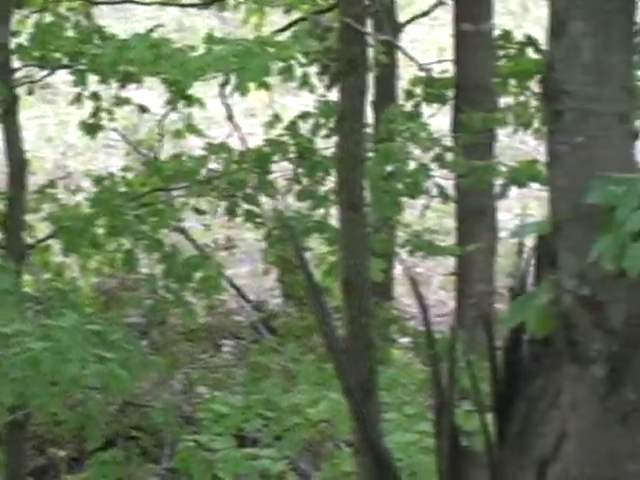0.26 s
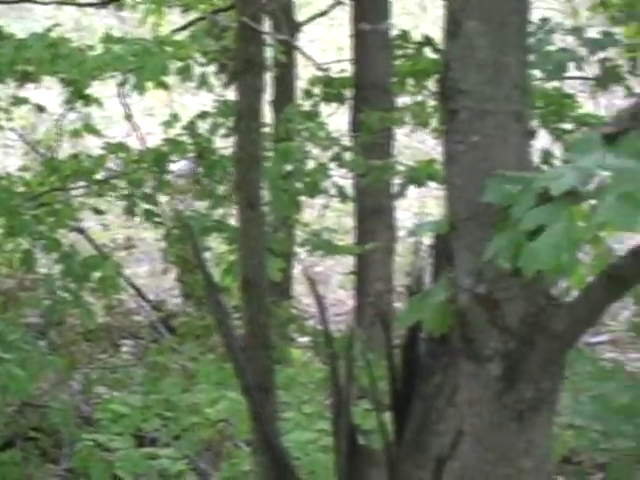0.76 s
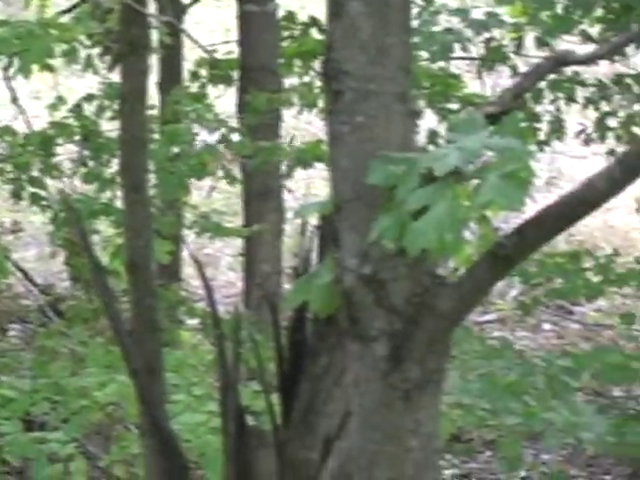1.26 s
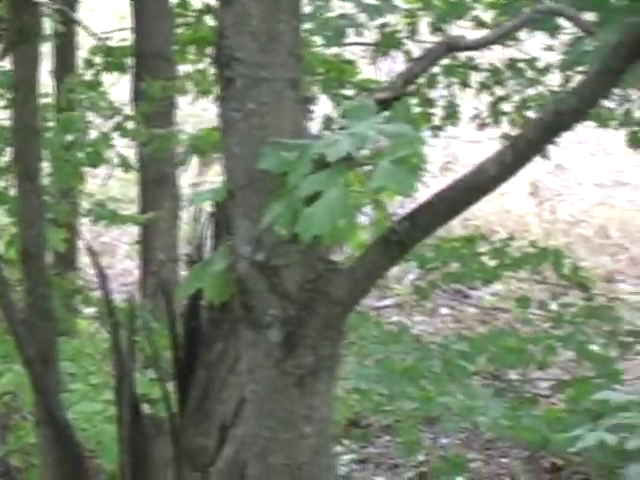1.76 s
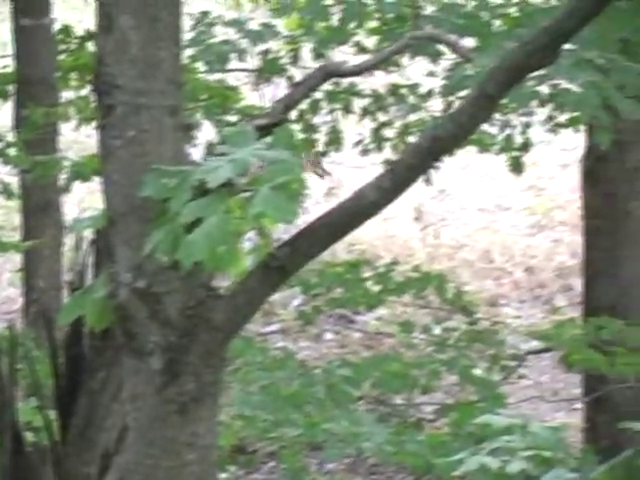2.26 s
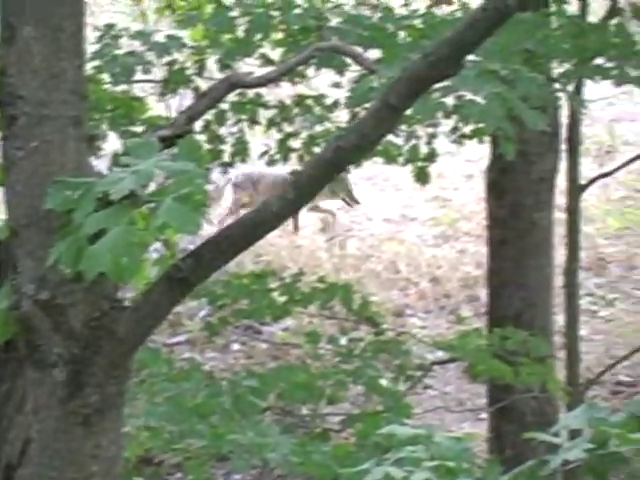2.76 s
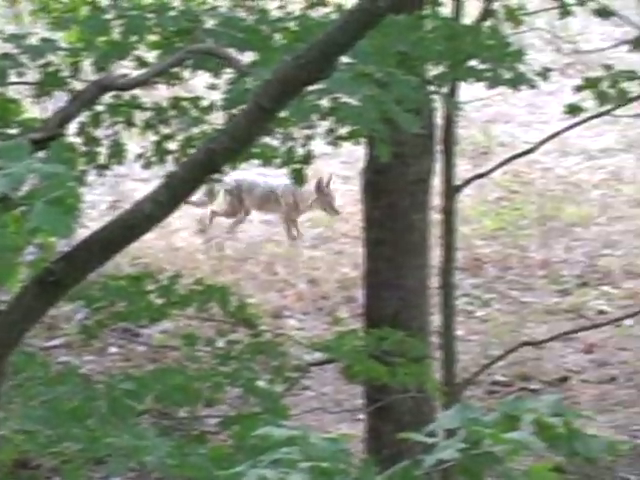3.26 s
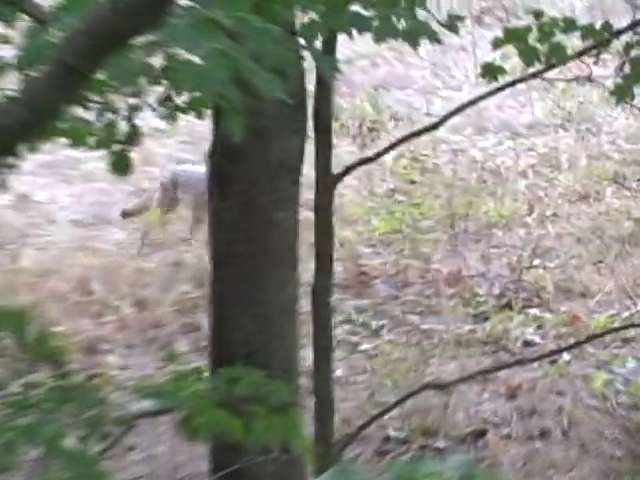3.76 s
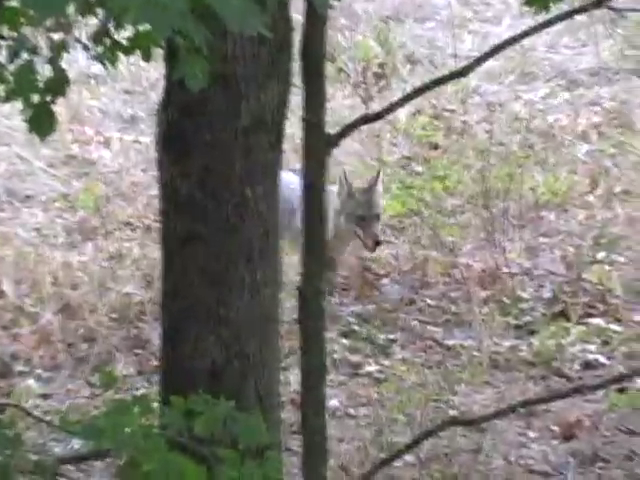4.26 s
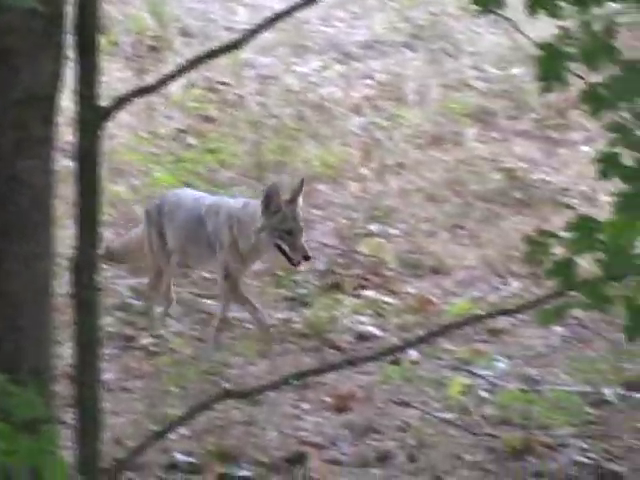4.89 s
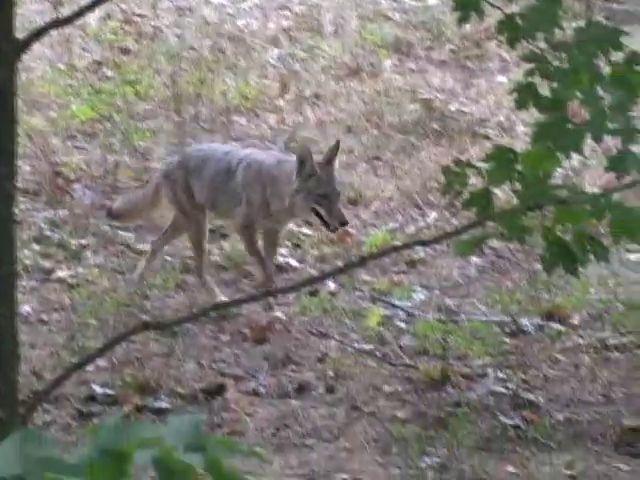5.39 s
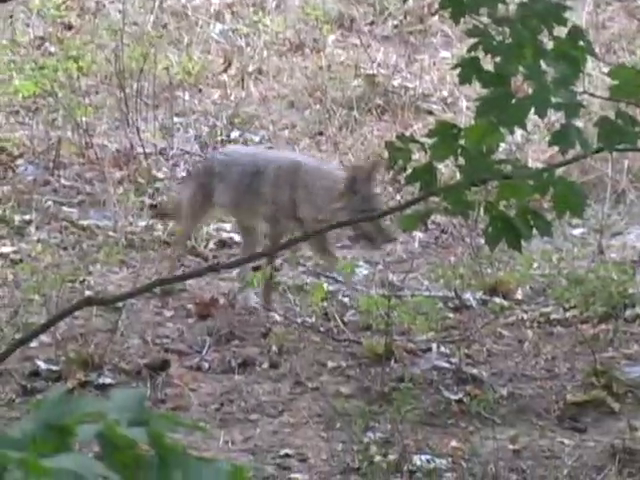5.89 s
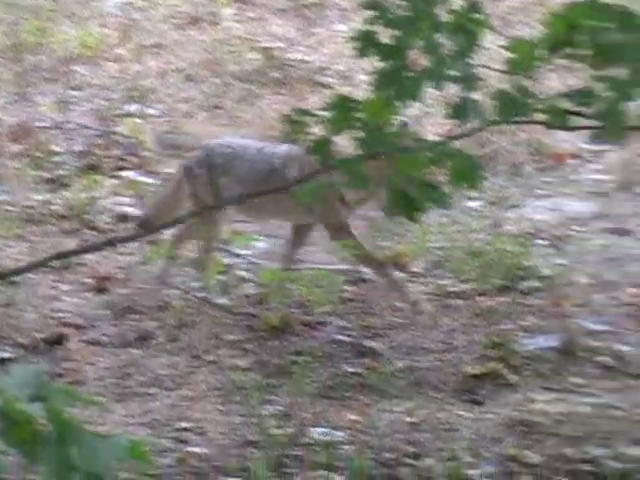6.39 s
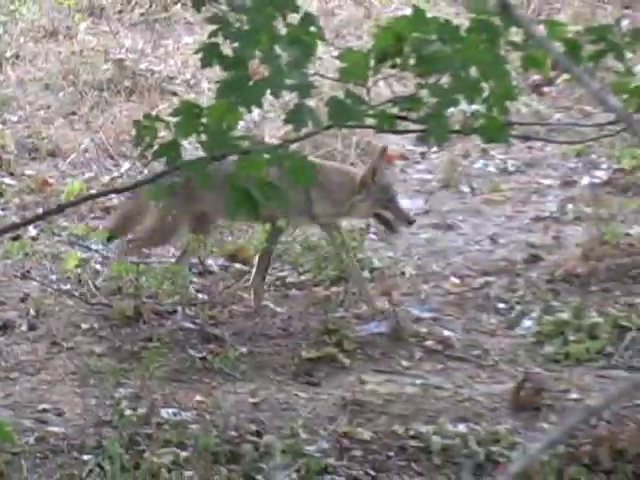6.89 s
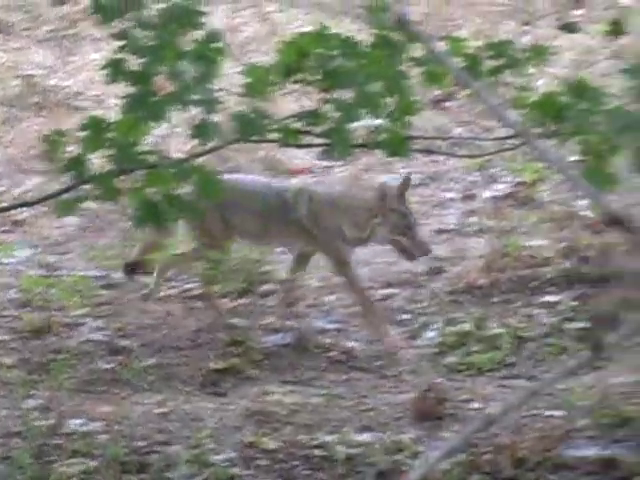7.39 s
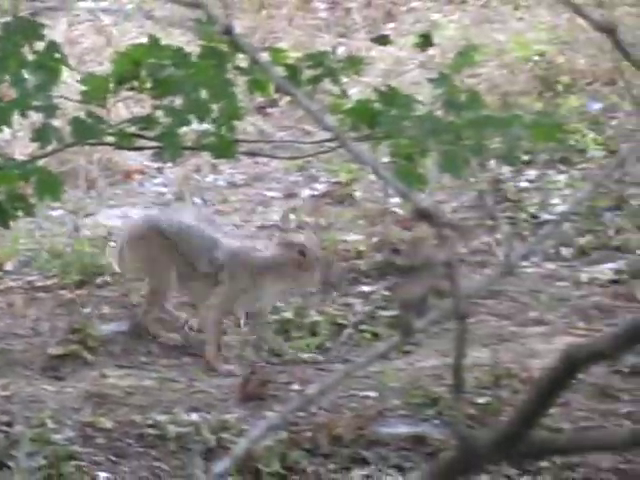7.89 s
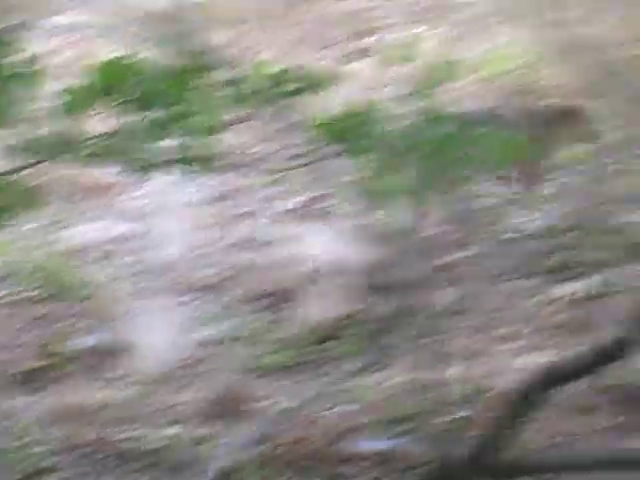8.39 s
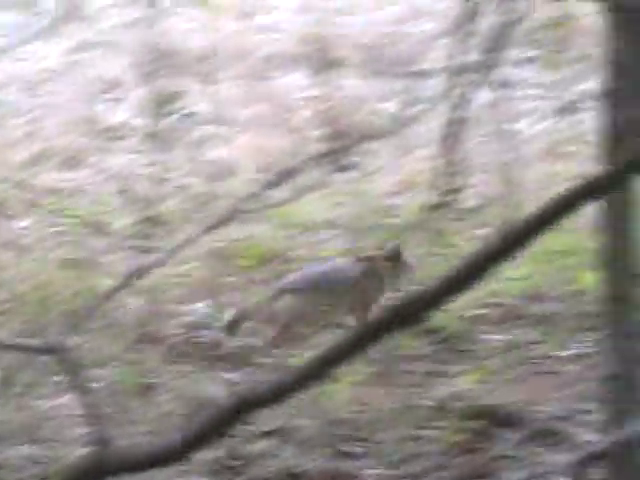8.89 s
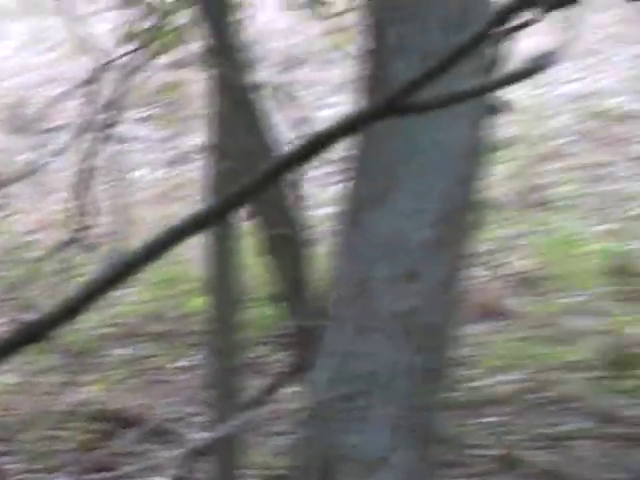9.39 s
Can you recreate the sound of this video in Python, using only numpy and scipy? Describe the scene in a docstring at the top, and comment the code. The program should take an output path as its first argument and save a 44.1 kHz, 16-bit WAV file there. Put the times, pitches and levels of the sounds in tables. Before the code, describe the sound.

A coyote trots over dry leaves amid singing insects, until a close bow shot and arrow smack send it bolting with a yelp.

```python
"""A coyote trots over dry leaves in summer woods, each paw setting off a burst of tiny fractures.
Insects sing, a far machine hums, faint calls carry through the trees, and a camera's zoom clicks and
purrs. A bow fires close on the right, its string and frame ringing in their modes, and the arrow
smacks into the ground. The coyote bolts through the litter with one short, quavering yelp.
Trunks and foliage scatter the sound into a thin reverberant tail."""
import sys
import numpy as np
from scipy import signal
from scipy.fft import rfft, irfft, next_fast_len
from scipy.io import wavfile
from scipy.ndimage import map_coordinates

SR = 44100
rng = np.random.default_rng(int(sys.argv[2]) if len(sys.argv) > 2 else 0)


def master_out(mix):
    """Clip the mix to full scale and print it as 16-bit PCM to the path in sys.argv[1]."""
    frames = np.transpose(np.atleast_2d(mix))
    ceiling = np.clip(frames, -1, 1)
    pcm = np.round(ceiling * 32767).astype(np.int16)
    wavfile.write(sys.argv[1], SR, pcm)


N = 425549
TIME = np.arange(N) / SR
AFTER = TIME[:SR // 2]  # seconds since the onset of a short event


def amp(db):
    """Decibels to amplitude ratio."""
    return np.exp(np.asarray(db) * np.log(10) / 20)


def unit(x):
    """Scale to rms 1."""
    return x / np.sqrt(np.mean(x ** 2) + 1e-20)


def along(points, hz):
    """Interpolate (Hz, value) points on a logarithmic frequency axis."""
    freqs, values = np.transpose(points)
    return np.interp(np.log(hz + 1), np.log(freqs + 1), values)


def curve(rows, outside=None):
    """Interpolate (seconds, value) points at every sample."""
    times, values = np.transpose(rows)
    return np.interp(TIME, times, values, outside, outside)


def level(rows):
    """Gain from (seconds, dB) points, silent outside their span."""
    return amp(curve(rows, -200))


def wobble(rate, step=32):
    """Smooth random modulation with `rate` knots a second."""
    coarse = TIME[::step]
    knots = rng.standard_normal(int(N * rate / SR) + 4)
    return np.interp(TIME, coarse, map_coordinates(knots, [coarse * rate]))


def swell(start, rise, decay, hold=0):
    """Envelope with a smooth rise, a hold and an exponential decay, all in seconds."""
    age = np.maximum(TIME - start, 0)
    attack = np.sin(np.pi / 2 * np.minimum(age / rise, 1)) ** 2
    return attack * np.exp(-np.maximum(age - rise - hold, 0) / decay)


def filtered(x, response):
    """Zero-phase filter whose gain is a function of frequency."""
    size = next_fast_len(N + 8192)
    return irfft(rfft(x, size) * response(np.fft.rfftfreq(size, 1 / SR)), size)[..., :N]


def coloured(x, spectrum, size=2048):
    """Minimum-phase filter of unit energy, shaped by (Hz, dB) points."""
    magnitude = amp(along(spectrum, np.fft.rfftfreq(size, 1 / SR)))
    cepstrum = irfft(np.log(magnitude + 1e-6))
    cepstrum[1:size // 2] *= 2
    cepstrum[size // 2 + 1:] = 0
    kernel = irfft(np.exp(rfft(cepstrum)))
    return signal.oaconvolve(x, kernel[None] / np.linalg.norm(kernel), axes=1)[:, :N]


def pan(db):
    """Channel gains for a left-minus-right level difference."""
    half = np.atleast_1d(db) / 2
    gains = np.array([amp(half), amp(-half)])
    return gains / gains.mean(0)


def spread(pair, width):
    """Mid and side signals to left and right."""
    return np.array([pair[0] + width * pair[1], pair[0] - width * pair[1]])


def widened(pair, widths):
    """Mid and side to left and right, with a width that depends on frequency."""
    side = filtered(pair[1], lambda hz: along(widths, hz))
    return spread([pair[0], side], 0.96)


def noise(width):
    """White stereo noise."""
    return spread(rng.standard_normal((2, N)), width)


def crackle(rate, scatter_db, width):
    """Poisson impulses of uneven size, `rate` a second in each of mid and side."""
    sizes = amp(scatter_db * np.clip(rng.standard_normal((2, N)), -2, 2))
    signs = rng.choice([-1, 1], (2, N))
    occurs = rng.random((2, N)) < rate / SR
    return spread(unit(sizes * signs * occurs), width)


def phase_of(hz):
    """Phase in radians, the time integral of frequency."""
    return 2 * np.pi * np.cumsum(hz) / SR


def ring(hz, t60, phase=0):
    """A damped mode that falls 60 dB in t60 seconds."""
    return np.sin(2 * np.pi * hz * AFTER + phase) * np.exp(-np.log(1000) * AFTER / t60)


def add(track, start, sound):
    """Superpose a sound from `start` seconds."""
    part = track[..., max(round(start * SR), 0):][..., :sound.shape[-1]]
    part += sound[..., :part.shape[-1]]


def insect_chorus():
    """Many insects sum incoherently to a steady band of high noise."""
    # Each row: frequency in Hz, relative spectral density in dB.
    spectrum = [(3000, -46.5), (4400, -15), (5400, -7.5), (5700, -15), (6100, -31.5), (6600, -11.5),
                (7100, -2.5), (7500, -0.5), (7780, 0), (8150, -2.5), (8700, -9.5), (9600, -23.5),
                (11000, -46)]
    band = coloured(noise(0.52), spectrum)
    return band * amp(-55 - 0.03 * wobble(1.26) + 0.93 * wobble(110)) * pan(-2.5)


def triller():
    """Amplitude modulation cuts one insect's shrill, jittering tone into even pulses."""
    pulses = np.clip(np.sin(phase_of(21 + .4 * wobble(3))) + .3, 0, 1)
    return amp(-55) * pulses * np.sin(phase_of(7800 + 220 * wobble(900))) * pan(-5)


def cricket():
    """Stridulation: each wing stroke slows as it closes, so its pitch falls."""
    strokes = np.cumsum(71 + .4 * wobble(3)) / SR
    from_middle = strokes % 1 - .5
    tone = np.sin(phase_of(5600 - 1100 * from_middle + 60 * wobble(600)))
    sounding = np.floor(strokes) % 12 > 0  # every twelfth stroke is silent
    chirps = np.exp(-(from_middle / .19) ** 2) * sounding
    return amp(-52 + 0.99 * wobble(30)) * chirps * tone * pan(9.9)


def faint_insect():
    """A narrow band of noise, modulated in amplitude, swells about twice a second."""
    surge = amp(2.9 * np.sin(2 * np.pi * 2.1 * TIME + wobble(0.75)))
    band = coloured(noise(0.27), [(3700, -47), (4200, -6), (4400, -3), (4650, -8), (5200, -47)])
    return amp(-70.5) * surge * band * pan(5)


def air():
    """Air in the crowns makes a diffuse field, joined by a fine hiss and a draught's rumble."""
    # Each row: frequency in Hz, relative spectral density in dB.
    spectrum = [(20, -35), (35, -5), (50, -3.5), (70, 5), (130, 2), (320, -1), (450, -4.5), (620, -5.5),
                (1000, -9), (1400, -10), (2000, -12), (4000, -13.5), (10000, -18), (15500, -23)]
    # Each row: time in seconds, hiss level in dB.
    hiss_levels = [(0, -66), (1.2, -61), (3.2, -60.5), (4.2, -71), (6.3, -76), (9.65, -71)]
    mid, side = coloured(rng.standard_normal((2, N)), spectrum)
    # diffuse sound is alike at both microphone ports in the bass and unrelated higher up
    side = signal.sosfilt(signal.butter(1, 380, "high", fs=SR, output="sos"), side)
    crowns = spread([mid, side], 0.89) * amp(-57 + 0.48 * wobble(11))
    hiss = coloured(noise(0.41), [(3000, -23), (8000, -13), (11000, -5), (15500, -1)])
    # the draught rumbles at each port on its own
    draught = coloured(rng.standard_normal((2, N)), [(20, 0), (40, -4), (80, -22), (300, -72)])
    return crowns + hiss * level(hiss_levels) + amp(-74) * draught


def far_machine():
    """A drone of three low partials, each wandering in amplitude and phase."""
    # Each row: frequency in Hz, relative level in dB, left minus right in dB,
    # phase lag on the right in radians, unsteadiness from 0 to 1.
    partials = [(76, -66.5, -0.5, 0.5, .8), (107, -75.5, -6, 0.5, 0.9), (149.9, -50, -8, 2.56, 0.08)]
    # The drone shifts right as the camera turns. Each row: time in seconds, added left minus right in dB.
    turn = [(2.5, .3), (5, -1.6)]
    out = np.zeros((2, N))
    for hz, db, side_db, lag, unsteady in partials:
        tone = (1 + unsteady * (wobble(14) + 1j * wobble(14))) * np.exp(2j * np.pi * hz * TIME)
        out += amp(db + 3.5) * pan(side_db + curve(turn)) * np.real([tone, tone * np.exp(-1j * lag)])
    return out


def footfalls(rows, rise):
    """Joint envelope of (start, dB, decay) steps: incoherent sounds add in power."""
    power = np.zeros(N)
    press = np.sin(np.pi / 2 * np.minimum(AFTER / rise, 1)) ** 2
    for start, db, decay in rows:
        settle = np.exp(-np.maximum(AFTER - rise, 0) / decay)
        add(power, start, (amp(db) * press * settle) ** 2)
    return np.sqrt(power)


def leaf_litter():
    """Brittle fracture: paws crush dry leaves in dense bursts, with a few separate cracks."""
    # Paws at a trot. Each row: start in seconds, level in dB.
    steps = [(0, -57.0), (0.071, -55.5), (0.17, -49.5), (0.301, -55.5), (0.503, -53.0), (0.771, -51.5),
             (1.072, -56.0), (1.393, -52.5), (1.982, -60.0), (2.271, -57.0), (2.628, -56.0), (2.751, -56.0),
             (2.953, -58.5), (3.067, -60.0), (3.236, -57.5), (3.643, -54.0), (3.953, -50.5), (4.059, -57.5),
             (4.157, -56.0), (4.245, -56.5), (4.501, -56.5), (4.963, -62.5), (5.416, -58.5), (5.902, -57.5),
             (6.08, -56.5), (6.528, -55.5), (6.717, -52.5), (6.8, -52.5), (7.088, -58.5), (7.262, -58.0)]
    # Paws in full flight. Each row: start in seconds, level in dB, decay in seconds.
    bounds = [(7.972, -33.5, 0.073), (8.097, -36.5, 0.035), (8.13, -31, 0.03), (8.239, -37, 0.057),
              (8.284, -29, 0.064), (8.361, -34, 0.018), (8.515, -34, 0.082), (8.543, -32.5, 0.067),
              (8.601, -37.5, 0.067), (8.783, -33.5, 0.037), (8.867, -31.5, 0.031), (9.034, -37, 0.012),
              (9.137, -35, 0.05), (9.436, -38.5, 0.053), (9.615, -44, 0.041)]
    # Leaves kicked up between bounds. Each row: time in seconds, level in dB.
    churn = [(7.98, -46.8), (8.7, -38.8), (9.66, -50.2)]
    # Crushed litter, then single leaves. Each row: frequency in Hz, relative spectral density in dB.
    crush_spectrum = [(180, -25), (300, -11.5), (391, -20), (535, -10), (821, -14.5), (1260, -13.5),
                      (1460, -15), (1750, -15), (4800, -2), (7140, -4.3), (8280, -7.5), (12500, -13),
                      (15500, -21.5)]
    crack_spectrum = [(2000, -22), (3200, -3), (6000, -9), (11500, -1), (15500, -18)]
    # Each row: frequency in Hz, relative stereo width.
    widths = [(300, .22), (900, 0.34), (3000, 0.24), (12000, 0.22)]
    settle_s = 0.1
    trot = footfalls([(start, db, settle_s) for start, db in steps], rise=0.078)
    trot = trot * amp(1.3 * wobble(45)) * pan(-1.5)
    flight = np.hypot(footfalls(bounds, rise=0.025), level(churn))
    flight = flight * amp(.9 * wobble(70)) * pan(-.8)
    crush = widened(trot * crackle(2000, 3, .8) + flight * crackle(6000, 3.7, .95), widths)
    cracks = (amp(-12) * trot + amp(-18) * flight) * crackle(110, 3.7, .3)
    return coloured(crush, crush_spectrum) + coloured(cracks, crack_spectrum)


def twigs():
    """Each twig fractures in a decaying burst of noise around its own pitch."""
    # Each row: start in seconds, initial level in dB, pitch in Hz, decay in seconds.
    snaps = [(.033, -50, 4500, .008), (.135, -52, 3800, .02), (.233, -47, 6000, .008),
             (0.265, -41, 13000, .002), (.292, -48, 13000, .002), (.346, -49, 12500, .002),
             (.577, -48, 7000, .008), (0.849, -57, 1700, .04), (2.278, -45, 11000, .003),
             (3.189, -51, 2400, .005), (3.254, -52, 2500, .005), (4.123, -47.5, 3400, .012),
             (4.224, -49.5, 3200, 0.012), (4.335, -52, 3300, .015), (6.57, -54, 11000, .015),
             (6.771, -50, 3500, 0.018), (6.863, -48, 4500, .012), (7.158, -50, 12000, .003),
             (7.191, -53, 12000, .003), (8.342, -29, 8000, 0.0054), (8.688, -25, 9000, 0.0073),
             (8.727, -28.5, 6000, 0.0047), (8.846, -30, 5500, .007), (8.972, -32, 6000, 0.0063),
             (9.053, -27.5, 6000, .012)]
    out = np.zeros((2, N))
    for start, db, hz, decay in snaps:
        band = signal.butter(1, [0.8 * hz, min(1.24 * hz, SR / 2 - 1)], "band", fs=SR, output="sos")
        burst = unit(signal.sosfilt(band, rng.standard_normal((2, len(AFTER)))))
        add(out, start, amp(db) * spread(burst, 0.25) * np.exp(-AFTER / decay))
    return out


def far_calls():
    """Propagation through deep woods smears each call into a soft, hoarse swell."""
    # Each row: time of the peak in seconds, relative level in dB.
    calls = [(.87, -67), (1.42, -70), (2.08, -69), (2.7, -66.5), (3.45, -64.5), (4.2, -67), (4.88, -69),
             (5.55, -68), (6.2, -68)]
    envelope = np.zeros(N)
    for peak, db in calls:
        add(envelope, peak - .2, amp(db) * np.exp(-((AFTER - .2) / .085) ** 2))
    voice = coloured(noise(.5), [(800, -41), (1150, -6), (1370, 5), (1600, -8), (2200, -36)])
    return amp(0.5) * envelope * voice


def zoom():
    """The zoom lever's impact excites the camera body's modes; the lens motor purrs for a second."""
    # The motor. Each row: frequency in Hz, relative spectral density in dB.
    purr_spectrum = [(120, -35), (190, -7), (228, 1), (270, -5.5), (350, -5), (480, -15), (900, -37),
                     (3000, -70)]
    # Each row: time in seconds, motor level in dB.
    purr_levels = [(3.36, -74), (3.42, -57.5), (3.9, -62), (4.3, -65), (4.45, -86)]
    # Each row: frequency in Hz, relative level in dB, T60 in seconds, left minus right in dB.
    body_modes = [(385, -7, 0.1, -9), (598, 0.5, 0.047, 15), (690, 1, 0.042, 9), (850, -3, .03, 6),
                  (1140, -2, 0.035, 0), (1310, -0.5, 0.049, -5), (1550, -6, 0.028, 0), (1700, -5, .035, -8),
                  (2050, -6, 0.032, 4), (2450, -8, .03, 0), (2750, -9, .03, 0)]
    # The lever's plastic rattle. Each row: frequency in Hz, relative spectral density in dB.
    clack_spectrum = [(250, -25), (600, -1), (1400, 0), (2500, -6), (7000, -32)]
    click_s = 3.3652
    out = coloured(noise(0.42), purr_spectrum) * level(purr_levels)
    for hz, db, t60, side_db in body_modes:
        add(out, click_s, amp(db - 35) * pan(side_db) * ring(hz, t60, rng.uniform(0, 4.3)))
    click = rng.standard_normal(len(AFTER)) * np.exp(-AFTER / .002)
    clack = coloured(rng.standard_normal((2, N)), clack_spectrum) * np.exp(-TIME / .009)
    add(out, click_s - .0007, amp(-43) * click)
    add(out, click_s, amp(-40) * clack)
    return out


def bow():
    """Impulsive excitation: the trigger clicks, the string slams home, the frame rattles and rings."""
    # Limbs, riser and cables. Each row: frequency in Hz, relative level in dB, T60 in seconds.
    modes = [(348, 0, 0.21), (496, -7, .2), (655, -2, 0.13), (765, -11.5, 0.26), (997, -9, 0.078),
             (1396, -1, 0.12), (2255, -5.5, .12), (2330, -11, .16), (2680, -17, 0.15), (3100, -10, .12),
             (4000, -15, 0.13), (4230, -15, .14), (4870, -7, 0.13), (5800, -14, 0.14)]
    # Each row: frequency in Hz, relative spectral density in dB.
    rattle_spectrum = [(60, -40), (110, -22), (170, -13), (235, -14.5), (345, -2.5), (420, -3.5), (500, -7),
                       (660, -7.5), (800, -11), (1200, -18), (1380, -5.5), (1850, -15.5), (2320, -10),
                       (3770, -17.5), (7500, -16), (15500, -32.5)]
    # The bow is close and large. Each row: frequency in Hz, relative stereo width.
    widths = [(60, .3), (150, .12), (400, 0.22), (1000, .42), (2500, 0.66), (15000, 0.8)]
    # Each row: frequency in Hz, left minus right in dB.
    balance = [(200, 0.5), (380, -1.5), (700, -3), (1300, -5), (2400, -10), (4400, -8), (8100, -10),
               (15000, -4)]
    slam_s, rise_s = 7.666, .007
    string_hz, harmonics_db = 92.5, [-14.5, 1, -3.5, -3, -11]
    trigger = amp(-37) * swell(7.6592, rise=0.0014, decay=.02)
    slam = amp(-19) * swell(slam_s, rise_s, decay=.0055, hold=.0125)
    fittings = amp(-30.5) * swell(slam_s, rise_s, decay=0.032, hold=0.039)
    contacts = coloured(crackle(14000, 3.6, 0.99), rattle_spectrum)
    rattle = widened(contacts * (trigger + np.hypot(slam, fittings)), widths)
    frame = sum(amp(db) * ring(hz, t60, rng.uniform(0, 2 * np.pi)) for hz, db, t60 in modes)
    # the string swings on, its overtones beating a quick flutter
    string = sum(amp(db) * ring(string_hz * k, t60=.25) for k, db in enumerate(harmonics_db, 1))
    build_up = 1 - np.exp(-AFTER / 0.0047)
    body = np.zeros(N)
    add(body, 7.669, (amp(-19.5) * frame + amp(-22.5) * string) * build_up)
    return filtered(rattle + body, lambda hz: pan(along(balance, hz)))


def arrow_flight():
    """Flow noise: the vanes hiss until the arrow lands."""
    # Each row: time in seconds, level in dB.
    vane_levels = [(7.68, -39), (7.8, -45.5), (7.9, -51.5), (7.965, -46.5), (7.971, -42)]
    hiss = coloured(noise(0.17), [(1000, -19), (3500, -2.5), (6000, -3), (15000, -17)])
    return hiss * level(vane_levels)


def arrow_impact():
    """Point and shaft strike the ground in a cluster of broadband cracks over a damped thud."""
    # Each row: start in seconds, relative crack level in dB, relative thud level in dB.
    strikes = [(7.9709, -14, -31), (7.9745, -16, -23), (7.9801, -24.5, -38), (7.9825, -25, -24)]
    # Each row: frequency in Hz, relative spectral density in dB.
    crack_spectrum = [(60, -25), (190, -3), (350, -12), (550, -3.5), (1100, -16), (1600, -5), (1950, -13.5),
                      (2500, -4.5), (3900, -13), (5000, -4), (8000, -18.5), (15000, -32)]
    force, thud = np.zeros(N), np.zeros(N)
    for start, crack_db, thud_db in strikes:
        add(force, start, amp(crack_db) * (np.exp(-AFTER / 0.0013) + 0.13 * np.exp(-AFTER / 0.017)))
        add(thud, start, amp(thud_db) * (0.65 * ring(132, 0.073) + 0.5 * ring(480, 0.013)))
    cracks = coloured(rng.standard_normal((2, N)) * force, crack_spectrum)
    return widened(cracks, [(100, 0.31), (1500, .2), (6000, 0.061)]) + thud


def yelp():
    """A nearly pure cry that grows louder; jitter makes it hoarse, amplitude modulation shakes it."""
    # The pitch arches. Each row: time in seconds, frequency in Hz.
    pitch = [(9.165, 900), (9.185, 920), (9.212, 1000), (9.262, 985), (9.3, 875)]
    start, rise, hold = 9.165, 0.017, .083  # seconds
    quaver_hz, growth_db_per_s = 26.1, 45
    phase = phase_of(curve(pitch) * (1 + .022 * wobble(260)))
    age = np.clip(TIME - start, 0, rise + hold)
    quaver_db = 2.8 * np.cos(2 * np.pi * quaver_hz * (age - rise))
    effort_db = -43 + growth_db_per_s * age + quaver_db + 1.7 * wobble(150)
    effort = swell(start, rise, decay=.007, hold=hold) * amp(effort_db)
    return (np.sin(phase) + amp(-24) * np.sin(2 * phase)) * effort * pan(.5)


def woods(x):
    """Scattering by trunks and foliage leaves a tail whose decay time depends on frequency."""
    # Each row: frequency in Hz, T60 in seconds.
    decay_times = [(150, .22), (350, 0.26), (700, 0.44), (3000, 0.55), (8000, 0.22), (15000, 0.35)]
    hz, t, spectra = signal.stft(rng.standard_normal((2, SR)), SR, nperseg=256)
    decay = np.exp(-np.log(1000) * t / along(decay_times, hz)[:, None])
    tail = signal.istft(spectra * decay, SR, nperseg=256)[1]
    build_up = 1 - np.exp(-TIME[:tail.shape[1]] / 0.017)
    tail = spread(tail * build_up, 0.53)
    return signal.fftconvolve(x, tail / np.linalg.norm(tail[0]), axes=1)[:, :N]


def scene():
    """Superposition at the microphone; the shot, the coyote and the insects also reverberate."""
    # Each row: sound, level of its reverberation relative to it in dB.
    sources = [(bow() + arrow_flight(), -26.5), (arrow_impact(), -11.5),
               (leaf_litter() + twigs(), -16), (yelp(), -22),
               (insect_chorus() + triller() + cricket() + faint_insect(), -9)]
    direct = sum(sound for sound, _ in sources)
    scattered = woods(sum(sound * amp(db) for sound, db in sources))
    return direct + scattered + zoom() + far_calls() + air() + far_machine()


def record(dry):
    """The camera filters out rumble, rounds the highest peaks by saturation and limits the band."""
    rumble_hz, top_hz = 44, 15750
    thin = signal.sosfilt(signal.butter(3, rumble_hz, "high", fs=SR, output="sos"), dry)
    rounded = thin / (1 + np.abs(thin) ** 6) ** (1 / 6)
    return filtered(rounded, lambda hz: hz < top_hz)


dry = scene()
out = record(dry)
master_out(out)
```